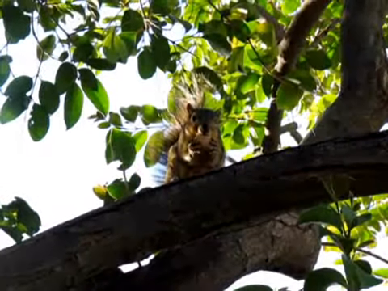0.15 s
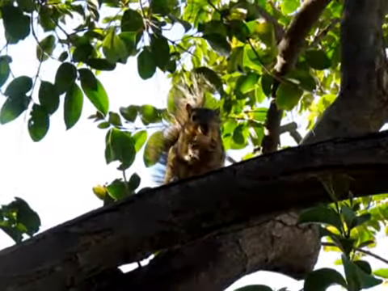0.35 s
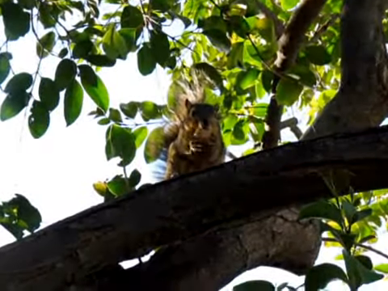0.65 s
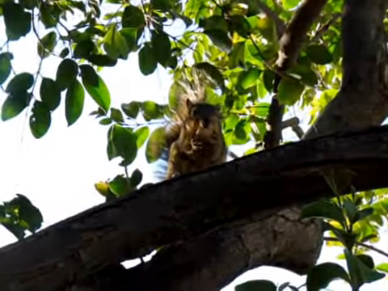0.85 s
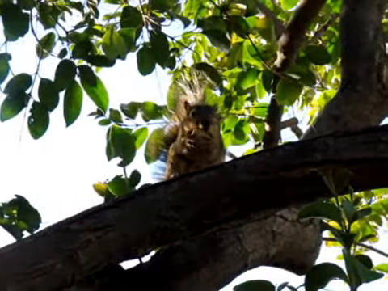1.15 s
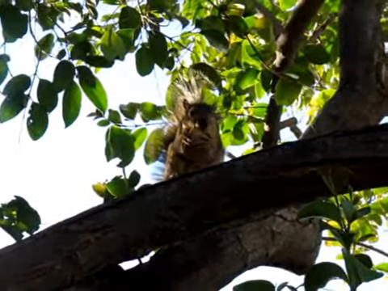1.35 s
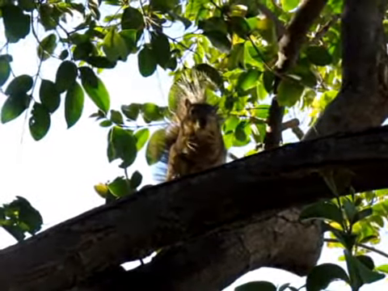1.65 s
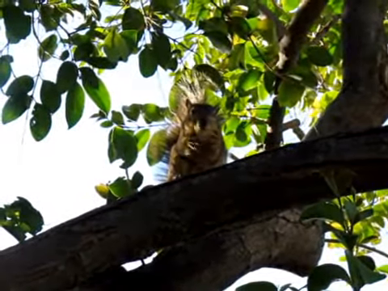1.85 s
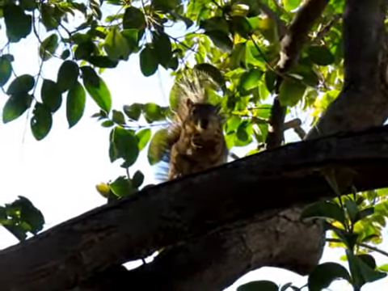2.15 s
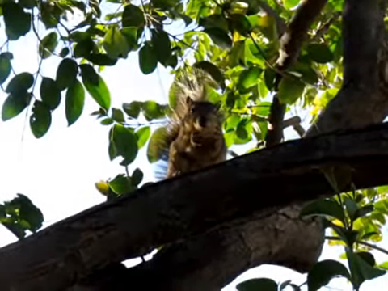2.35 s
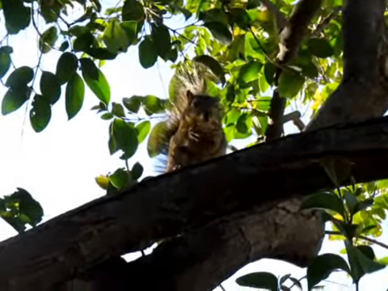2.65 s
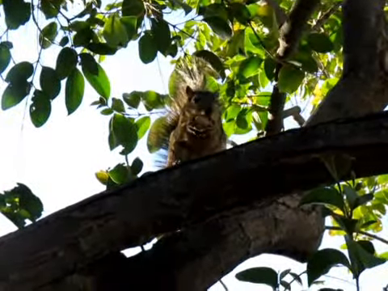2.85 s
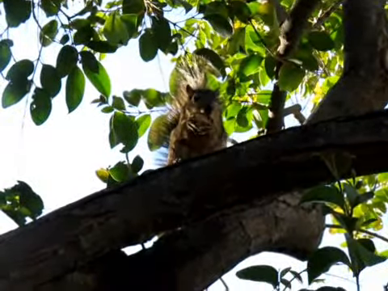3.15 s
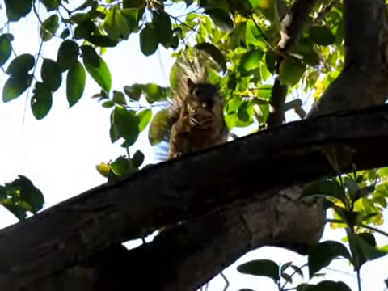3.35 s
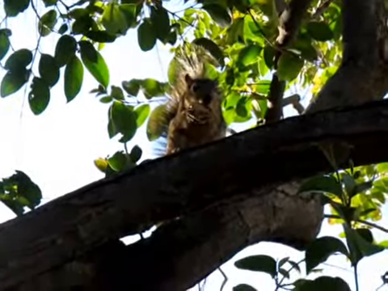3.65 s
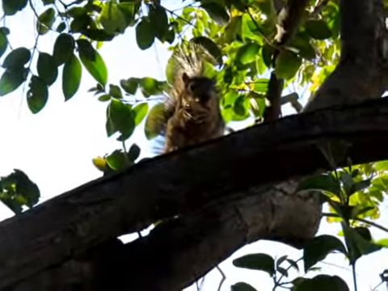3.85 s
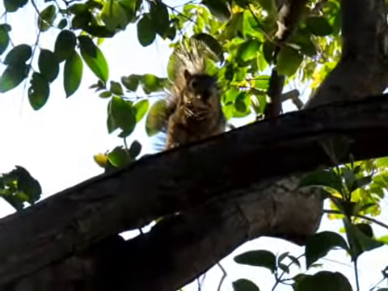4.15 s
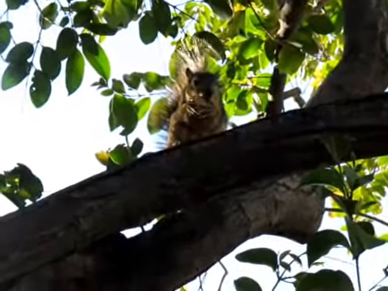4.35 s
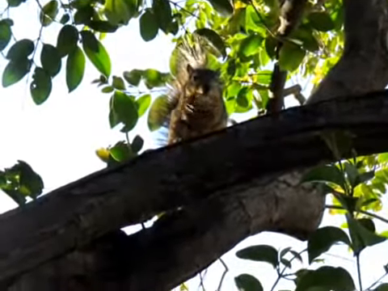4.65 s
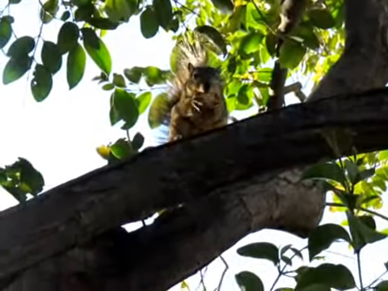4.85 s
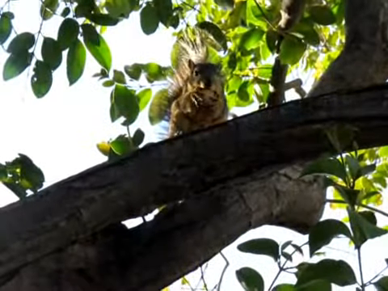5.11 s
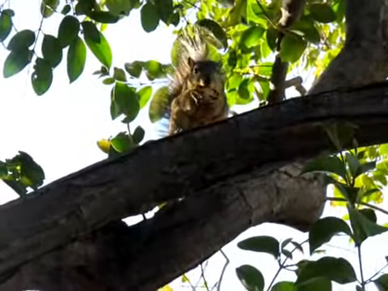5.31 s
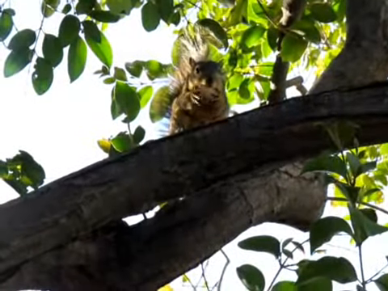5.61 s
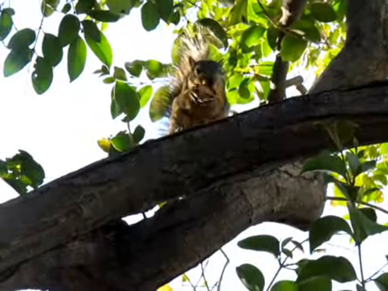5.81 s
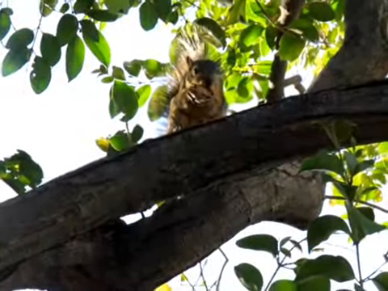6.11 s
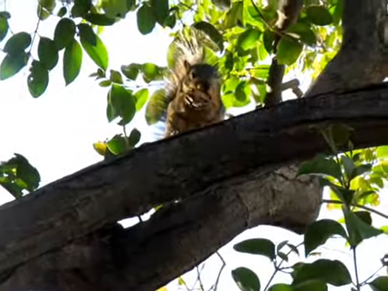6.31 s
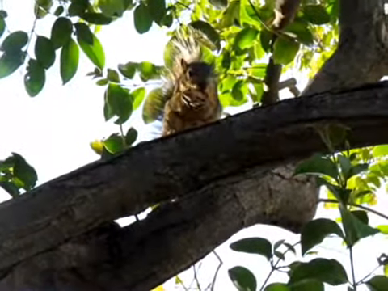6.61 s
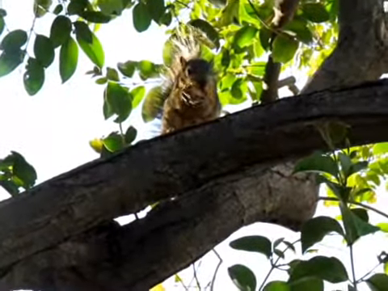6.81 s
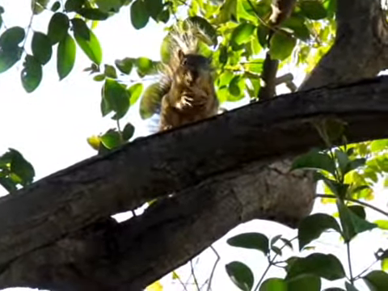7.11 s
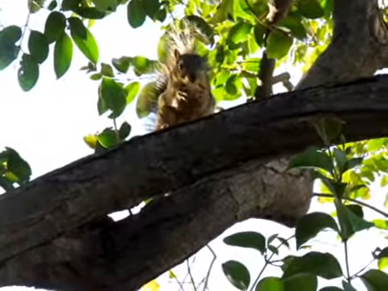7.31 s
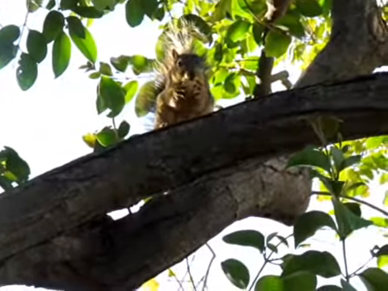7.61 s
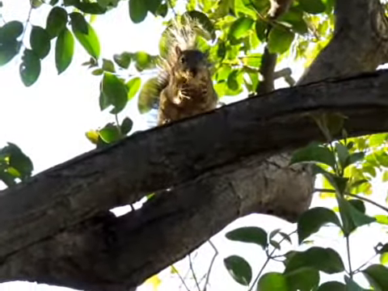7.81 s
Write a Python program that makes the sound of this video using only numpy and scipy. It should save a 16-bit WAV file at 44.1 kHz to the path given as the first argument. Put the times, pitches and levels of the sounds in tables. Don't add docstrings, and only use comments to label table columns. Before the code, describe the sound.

Low distant rumble and thin hiss, echoing sparrow chirps, faint tooth ticks and scraping, then a brittle crack and a much louder one.

```python
import sys
import numpy as np
from scipy import signal
from scipy.fft import rfft, irfft
from scipy.io import wavfile
from scipy.ndimage import uniform_filter1d, minimum_filter1d

SR = 44100
rng = np.random.default_rng(int(sys.argv[2]) if len(sys.argv) > 2 else 0)


def put_to_file(sound):
    columns = np.atleast_2d(sound).T
    safe = np.clip(columns, -1, 1)
    whole_steps = np.round(safe * 32767)
    wavfile.write(sys.argv[1], SR, whole_steps.astype(np.int16))


def makeup_ratio(level_db):
    decades = np.asarray(level_db, float) / 20
    return 10 ** decades


N = 351477


def rms_one(x):
    return x / np.sqrt(np.mean(x ** 2) + 1e-20)


def in_time(rows):
    s, *columns = np.transpose(rows)
    return [np.interp(np.arange(N) / SR, s, c) for c in columns]


def coloured(spectrum):
    hz, level_db = np.transpose(spectrum)
    log_f = np.log(np.fft.rfftfreq(N, 1 / SR) + 1e-3)
    gain = makeup_ratio(np.interp(log_f, np.log(hz), level_db, -99, -99))
    return rms_one(irfft(rfft(rng.standard_normal(N)) * gain, N))


def resonate(x, hz, width_hz):
    r = np.exp(-np.pi * width_hz / SR)
    feedback = [1, -2 * r * np.cos(2 * np.pi * hz / SR), r * r]
    return signal.lfilter(np.array([1, 0, -1]) * (1 - r * r) / 2, feedback, x + 1e-18)


def whistle(hz):
    return np.sin(2 * np.pi * np.cumsum(hz) / SR)


def add(track, s, piece):
    i = round(s * SR)
    track[i:i + len(piece)] += piece[:N - i]


def echoes(x, t60, wet_db, gap_s):
    t = np.arange(round(.5 * SR)) / SR
    cloud = rng.standard_normal(len(t)) * makeup_ratio(-60 * t / t60) * (t > gap_s)
    return x + makeup_ratio(wet_db) * signal.fftconvolve(x, cloud / np.sqrt(np.sum(cloud ** 2)))[:N]


def strokes(rows, attack_s, release_s):
    t, out = np.arange(N) / SR, np.zeros(N)
    for s, length_s, start_db, end_db in rows:
        edge = np.clip(np.minimum((t - s) / attack_s, (s + length_s - t) / release_s + 1), 0, 1)
        out += edge ** 2 * makeup_ratio(np.interp(t, [s, s + length_s], [start_db, end_db]))
    return out


def grains(per_s, spread_db):
    happens = rng.random(N) < per_s / SR
    size = makeup_ratio(spread_db * np.minimum(rng.exponential(1, N), 4))
    return happens * size * rng.choice([-1, 1], N)


# f/Hz, level/dB per Hz
TRAFFIC = [(7.1, -41), (12, 1.5), (27, -2), (76, -4), (103, -10), (140, -13), (207, -18.5), (259, -18.5),
           (305, -21.5), (338, -24), (366, -24), (611, -28), (1600, -40), (2080, -46), (3520, -120)]
# f/Hz, level/dB per Hz
AIR = [(900, 7.5), (1500, -16), (2200, -2), (3000, -1), (3900, -1.5), (4600, -5.5), (6000, -8),
       (8000, -7.5), (9500, -7), (10500, -15.5), (11500, -13.5), (12500, -16.5), (13200, -21.5)]
# t/s, level/dB
BREEZE = [
    (0, -50.5),
    (.3, -55),
    (4, -55),
    (5, -58.5),
    (6.4, -56.5),
    (7.97, -58.5),
]
# f/Hz, width/Hz, level/dB, start t/s, end t/s
HUM = [(339.5, 3, -53.5, -1, 9), (252.4, 11.6, -56.5, 0, 7.4), (510.4, 14, -61, 0.12, 6.2),
       (419, 3, -54, 1.6, 2.2), (1865, 120, -67, 2.2, 6.8)]
TRAFFIC_DB, TRAFFIC_FOLLOWS = -31.5, .3


def background():
    air_db, = in_time(BREEZE)
    traffic_db = TRAFFIC_DB + TRAFFIC_FOLLOWS * (air_db - air_db.mean())
    out = makeup_ratio(traffic_db) * coloured(TRAFFIC) + makeup_ratio(air_db) * coloured(AIR)
    white, t = rng.standard_normal(N), np.arange(N) / SR
    for hz, w, db, start, end in HUM:
        running = np.clip(np.minimum(t - start, end - t) / 0.46 + 1, 0, 1)
        wander = rms_one(signal.lfilter([1], [1, -np.exp(-2 * np.pi * w / SR)], white))
        out += makeup_ratio(db + 2) * running * whistle(hz + .6 * w * wander)
    return out


# start t/s, length t/s, first gap t/s, level/dB
TRILLS = [
    (.6251, .39, .0402, -44),
    (1.6148, .745, .0416, -45.5),
    (2.7909, .86, .0424, -48),
]
TRILL_HZ, TRILL_S = 4050, 0.018
QUICKEN_S, PULSE_SPREAD_DB, PULSE_JITTER_S = .00052, 2.5, .001
TRILL_FADE_DB_PER_S = 3.5


def insect():
    out, t, k = np.zeros(N), np.arange(round(TRILL_S * SR)) / SR, np.arange(30)
    for start, length_s, gap_s, db in TRILLS:
        after = k * gap_s - QUICKEN_S * k * (k - 1) / 2
        for dt, (late, loud, off) in zip(after, rng.standard_normal((len(k), 3))):
            if dt < length_s:
                f = TRILL_HZ * (1.06 + .012 * off - 0.161 * t / TRILL_S)
                pulse = np.hanning(len(t)) * whistle(f)
                pulse_db = db - 7 - TRILL_FADE_DB_PER_S * dt + PULSE_SPREAD_DB * loud
                add(out, start + dt + PULSE_JITTER_S * late - TRILL_S / 4, makeup_ratio(pulse_db) * pulse)
    return echoes(out, 0.36, -0.5, 0.0088)


# t/s, centre f/Hz, swing f/Hz, level/dB
BUZZ = [
    (.027, 8830, 800, -39),
    (.04, 8900, 850, -34.5),
    (.095, 9100, 850, -35.5),
    (.104, 8850, 800, -43),
    (.112, 8700, 696, -31),
    (.175, 8340, 550, -37),
    (.195, 8220, 500, -42),
    (.235, 8150, 396, -52),
]
BUZZ_PER_S = 320
BUZZ_TILT_DB = -2


def buzzer():
    hz, swing, db = in_time(BUZZ)
    t = np.arange(N) / SR
    wobble = rms_one(resonate(rng.standard_normal(N), 45, 57))
    sweep = whistle(BUZZ_PER_S * (1 + .14 * wobble))
    calling = (t > BUZZ[0][0]) & (t < BUZZ[-1][0])
    call = makeup_ratio(db + BUZZ_TILT_DB * sweep) * calling * whistle(hz + swing * sweep)
    call = signal.sosfilt(signal.cheby1(6, 1, [7980, 9900], "band", fs=SR, output="sos"), call)
    return echoes(call, 0.15, 1.7, 0.0062)


# t/s, f/Hz, level/dB
CHEEP = [
    [(0, 4513, 8), (.008, 4500, 5.5), (.03, 4336, 3), (.046, 3326, 4.5), (.056, 4356, 3), (.068, 3400, 0.5),
     (.08, 3226, 4.5), (.092, 3080, -18)],
]
CHIRRUP = [
    [(0, 5700, -3), (.018, 5300, -11), (.026, 4800, 2), (.034, 5000, -29), (.05, 4730, -5),
     (.064, 4300, -9), (.075, 4000, 3.5), (.095, 4630, -12), (.105, 4200, -15)],
    [(.022, 2570, 1), (.043, 3730, -2.5), (.058, 3650, 3), (.074, 3500, 1), (.087, 2560, -2),
     (.11, 3805, 4), (.128, 3000, 4.5), (.142, 2480, -3.5)],
]
CHIP = [
    [(0, 4430, 8), (.01, 4550, -7.5), (.025, 4050, 2), (.035, 4400, -8), (.055, 3900, -6.5),
     (.075, 3400, 0)],
]
PEEP = [
    [(0, 3150, -1), (.035, 3220, 0), (.07, 3050, 9)],
]
RISE = [
    [(0, 3300, 2), (.02, 3900, -5), (.036, 4300, 3), (.045, 3500, 5), (.06, 2890, 4)],
]
# t/s, level/dB, pitch factor, stretch
CHEEPS = [(.405, -57, 1, 0.63), (1.065, -58.5, 0.98, 1), (2.029, -56.5, 1.01, 1.02),
          (2.584, -53.5, 0.96, 1.12), (2.671, -56, 0.97, 0.97), (3.263, -55.5, 0.93, 0.68),
          (3.35, -56, 0.98, 0.92), (3.754, -55, 0.95, 0.89), (4.02, -56.5, 1, 0.87),
          (4.714, -58, 0.99, 1.1), (5.364, -58, 0.86, 0.66), (6.066, -57.5, 0.99, 1.27),
          (6.703, -58.5, 0.96, 1), (7.296, -55.5, 0.93, 0.65), (7.93, -61, 0.92, 0.87)]
CHIRRUPS = [
    (.105, -50.5, 1.02, 0.92),
    (1.29, -48, 1.035, 0.87),
    (4.25, -49.5, 1, 0.84),
    (5.391, -54.5, 1.07, 0.82),
    (6.366, -50, 1, 0.88),
    (7.074, -52.5, 0.96, 0.47),
    (7.43, -53.5, 0.97, 0.79),
]
CHIPS = [
    (1.228, -46, 1, 0.6),
    (6.168, -43.5, 1.05, 0.87),
    (7.61, -52, .94, 1.5),
    (7.395, -48, .98, 0.68),
]
PEEPS = [
    (7.195, -56, 1, 0.67),
    (5.07, -81, 2.1, 0.56),
]
RISES = [
    (6.318, -52, 1, 1),
]
WARBLE, CLEAN_WARBLE = .04, .01


def sparrows():
    out = np.zeros(N)
    for shape, calls in ((CHEEP, CHEEPS), (CHIRRUP, CHIRRUPS), (CHIP, CHIPS), (PEEP, PEEPS), (RISE, RISES)):
        depth = CLEAN_WARBLE if shape is CHIRRUP else WARBLE
        for s, db, pitch, stretch in calls:
            for voice in shape:
                at, hz, level_db = np.transpose(voice)
                t = np.arange(at[0] * stretch, at[-1] * stretch, 1 / SR)
                warble = 1 + depth * np.sin(2 * np.pi * 120 * t)
                f = pitch * np.interp(t, at * stretch, hz) * warble
                loudness = makeup_ratio(db + np.interp(t, at * stretch, level_db))
                add(out, s + t[0], loudness * signal.windows.tukey(len(t), .15) * whistle(f))
    return echoes(out, .45, 2, .004)


# f/Hz, width/Hz, level/dB
TEETH = [(6450, 1900, 4), (7950, 600, 7.5), (9140, 300, 10.5), (8700, 500, 5), (11430, 1300, -11.5)]
# start t/s, length t/s, start level/dB, end level/dB
BOUTS = [
    (.68, 0.24, -60, -64),
    (1.53, 0.84, -61, -59),
    (2.64, 1.1, -62, -60),
    (3.9, 1.7, -72, -72),
    (5.69, 0.17, -63, -65),
    (7.92, .1, -59, -53),
]
BITE_ATTACK_S, BITE_RELEASE_S = 0.056, .09
# start t/s, length t/s, start level/dB, end level/dB
SHIFTS = [
    (.385, .015, -63, -64),
    (1.51, 0.093, -53, -53.5),
    (3.62, 0.13, -51, -59),
    (5.49, 0.028, -67, -52),
    (7.08, .09, -54, -59),
]
PAW_ATTACK_S, PAW_RELEASE_S = 0.014, .025


def gnawing():
    slips = grains(5000, 2.5)
    scrape = rms_one(sum(makeup_ratio(db) * resonate(slips, hz, w) for hz, w, db in TEETH))
    rustle = rms_one(resonate(resonate(grains(5400, 2), 2900, 5500), 2500, 5500))
    bites = strokes(BOUTS, BITE_ATTACK_S, BITE_RELEASE_S) * scrape
    return bites + strokes(SHIFTS, PAW_ATTACK_S, PAW_RELEASE_S) * rustle


# f/Hz, width/Hz, level/dB in the first crack and the ticks, level/dB in the second
SHELL = [(1280, 700, -15, -22.5), (1980, 420, -6.5, -16), (2300, 470, -1, -14), (3000, 530, -7.5, -20.5),
         (3840, 390, -9.5, -20), (5170, 840, -10, -14), (6250, 450, -8, -15.5), (7300, 550, -15, -11),
         (8400, 1600, -1, 3.5), (9400, 770, 5, -2.5), (10700, 2000, -30, -3)]


def shell(low, high, order):
    out = np.zeros(N)
    for k, (hz, w, *level_db) in enumerate(SHELL):
        ring = resonate(high if hz > 5000 else low, hz, w) * SR / (2 * np.pi * w)
        out += (-1) ** k * makeup_ratio(level_db[order]) * ring
    return out


# t/s, level/dB, leaf scatter level/dB, scatter tilt/dB per octave
CRACKS = [
    (5.3103, -17.5, -26, -0.5),
    (6.8967, -5, -21.5, 5.5),
]
# t/s, level/dB in the first crack, level/dB in the second
SPLINTERS = [
    (-.0018, -30, -26),
    (-.0008, -26, -18),
    (0, -22, -4),
    (.0003, -20, -5),
    (.0006, 3, -9),
    (.0009, -13, 4),
    (.00128, -20, -4),
]
# f/Hz, level/dB, time to fall 60 dB t/s
SCATTER = [(1570, -9, 0.074), (3000, -19, .1), (4500, -10, 0.29), (6400, -10, 0.26), (8740, 4, 0.22),
           (11500, -33, 0.164)]
# t/s, peak level/dB, brightness/dB
TICKS = [(0.3955, -41.5, 4), (0.7183, -44, 0), (2.1006, -43, 0), (2.2493, -43, -4), (2.8098, -48, 7),
         (3.718, -44, -3), (4.1051, -50, 0), (5.146, -49, 0), (5.35, -44, -7), (5.578, -42, -5.5),
         (5.6924, -52, 0), (6.092, -51, -11), (6.6129, -45, 4), (7.7648, -54, -1)]


def nut():
    out, t = np.zeros(N), np.arange(round(.3 * SR)) / SR
    for c, (s, db, scatter_db, tilt_db) in enumerate(CRACKS):
        clicks = np.zeros(N)
        for k, (dt, *step_db) in enumerate(SPLINTERS):
            clicks[round((s + dt) * SR)] = (-1) ** k * makeup_ratio(db + step_db[c])
        out += shell(clicks, clicks, order=c)
        lumps = makeup_ratio(1.4 * rms_one(resonate(rng.standard_normal(len(t)), 260, 250)))
        for hz, level_db, t60 in SCATTER:
            noise = rng.standard_normal(len(t))
            band = rms_one(resonate(resonate(noise, hz, 0.49 * hz), hz, 0.49 * hz))
            fall = makeup_ratio(-60 * t / t60) + makeup_ratio(2 - 60 * t / .07)
            rise = np.minimum(t / 0.0011, 1)
            band_db = db + scatter_db + level_db + tilt_db * np.log2(hz / 8800)
            add(out, s + 0.0021, makeup_ratio(band_db) * band * lumps * fall * rise)
    low, high = np.zeros(N), np.zeros(N)
    for s, db, bright_db in TICKS:
        i = round(s * SR)
        low[i], high[i] = makeup_ratio(db - bright_db + 3), makeup_ratio(db)
    return out + echoes(shell(low, high, order=0), 0.055, 0.4, 0.0019)


def scene():
    return (background() + insect() + buzzer() + sparrows() + gnawing() + nut())[None]


# f/Hz, level/dB over the air hiss at 10 kHz
KEPT = [(9800, -30), (10200, -7), (10700, -3), (11400, -1.2), (11700, 2), (12000, 28), (12950, 32),
        (13100, 70)]
MASKED_DB = -30


def thin_out(x):
    hz, _, cells = signal.stft(x, SR, nperseg=2048, noverlap=1536)
    power = uniform_filter1d(uniform_filter1d(np.abs(cells) ** 2, size=5, axis=1), size=3, axis=0)
    level_db = 10 * np.log10(power + 1e-20)
    hiss_db = np.median(level_db[(hz > 9900) & (hz < 10300)], axis=0)
    hiss_db = 1 + signal.medfilt(np.pad(hiss_db, 60, "median"), 61)[60:-60]
    faint_db = hiss_db + np.interp(hz, *np.transpose(KEPT))[:, None]
    masked_db = MASKED_DB - minimum_filter1d(-level_db, size=220, axis=0, origin=65)
    keep = (level_db > np.maximum(faint_db, masked_db)) | (hz[:, None] < 4000)
    return signal.istft(cells * keep, SR, nperseg=2048, noverlap=1536)[1][:N]


def roll_off(x):
    return signal.sosfilt(signal.butter(12, 13040, fs=SR, output="sos"), x)


def record(dry):
    over_db = np.maximum(20 * np.log10(np.abs(dry[0]) + 1e-9) + 11.0, 0)
    creep = 13.6 * np.arange(N) / SR
    held = np.maximum.accumulate(over_db + creep) - creep
    r = np.exp(-1 / (0.0061 * SR))
    gain = makeup_ratio(-signal.lfilter([1 - r], [1, -r], held))
    mix = thin_out(dry[0] * gain)[None]
    return roll_off(mix)


dry = scene()
out = record(dry)
put_to_file(out)
```